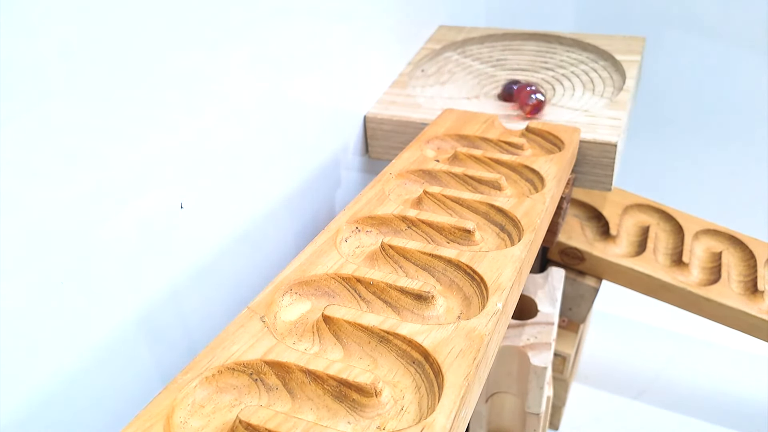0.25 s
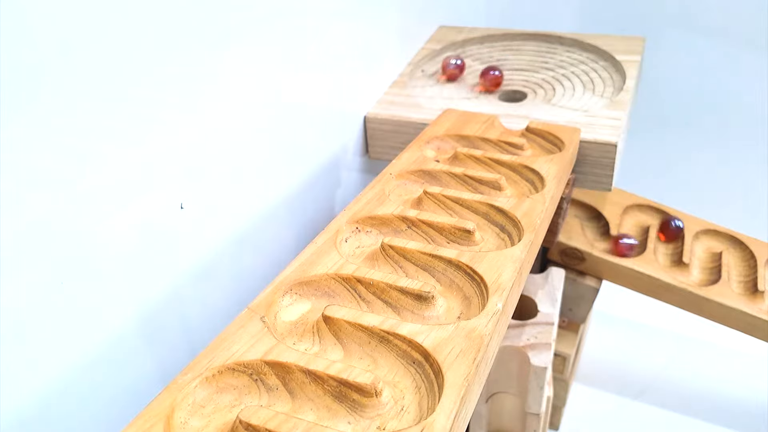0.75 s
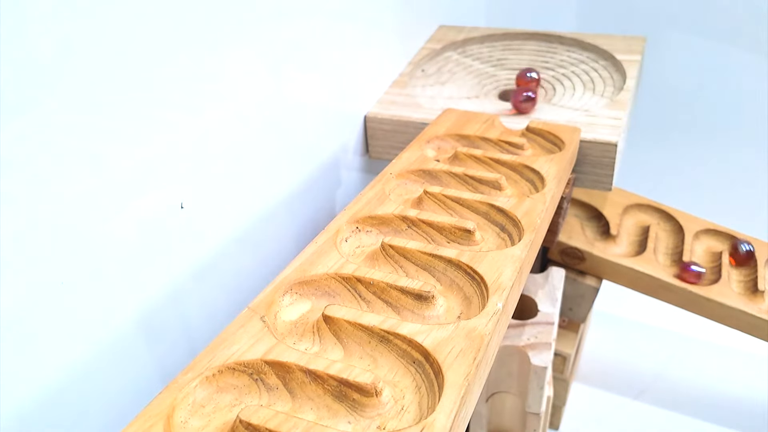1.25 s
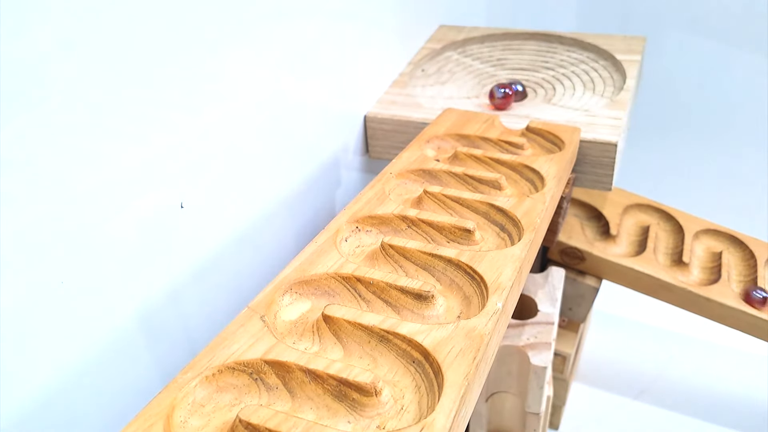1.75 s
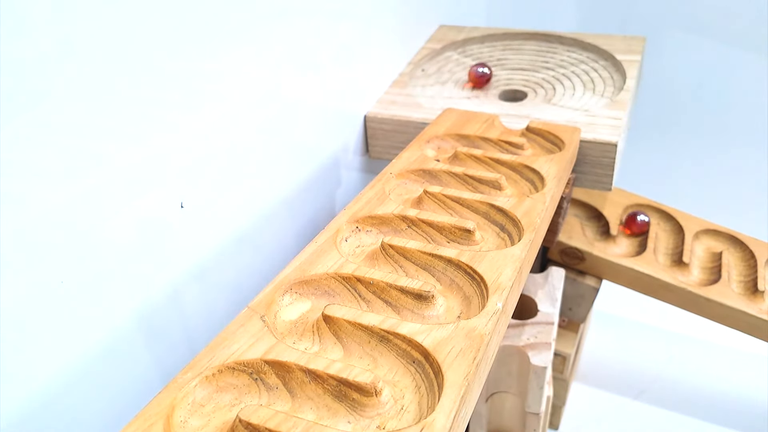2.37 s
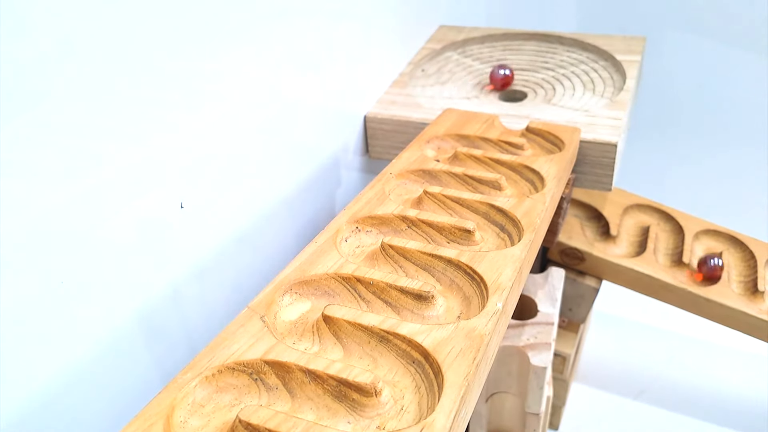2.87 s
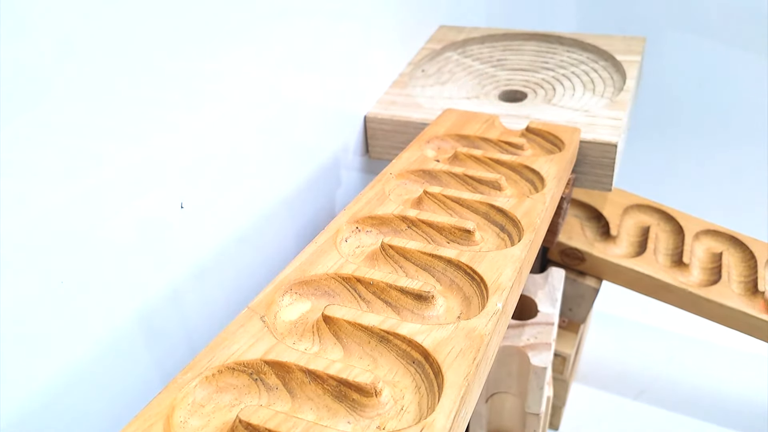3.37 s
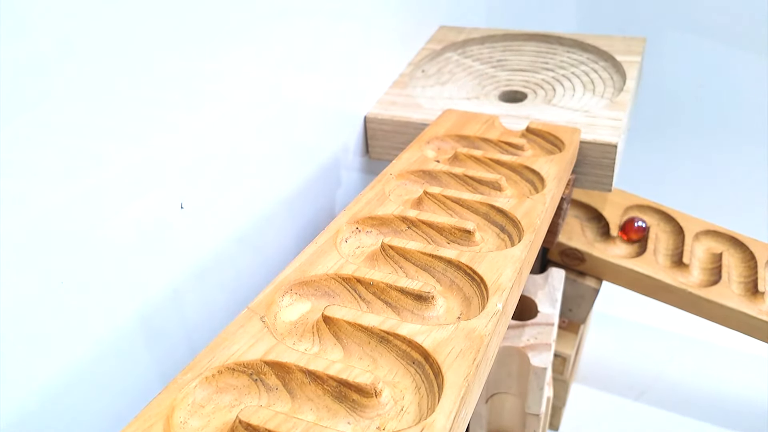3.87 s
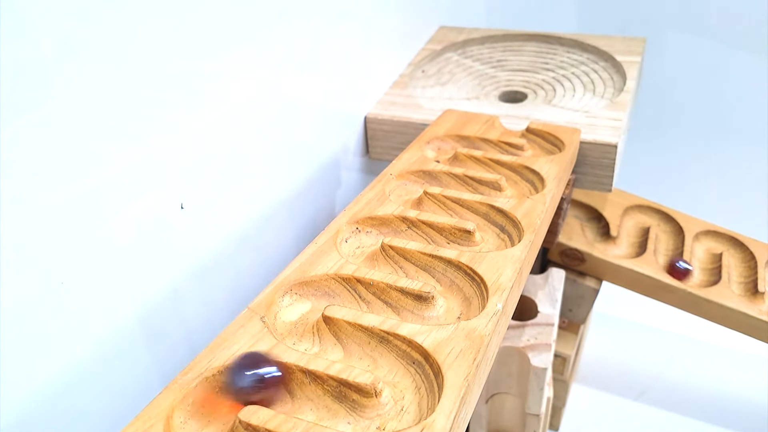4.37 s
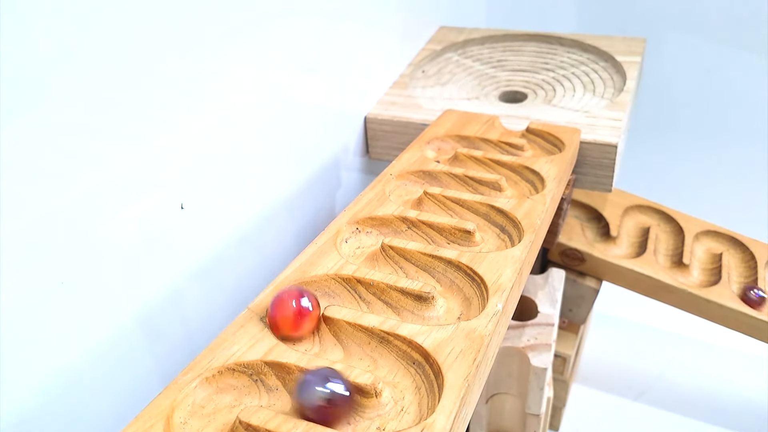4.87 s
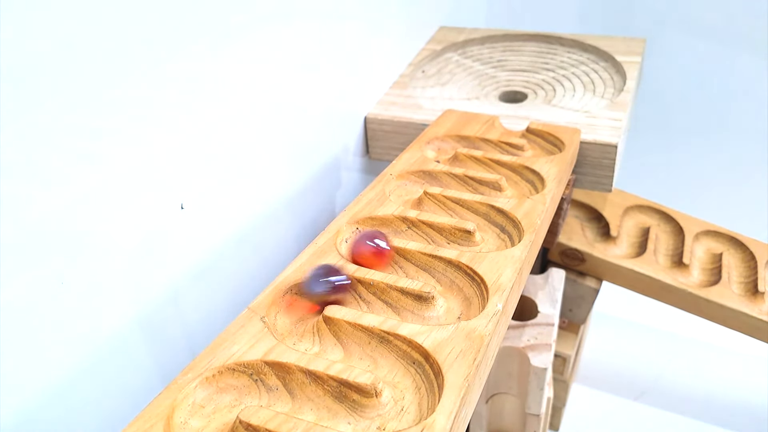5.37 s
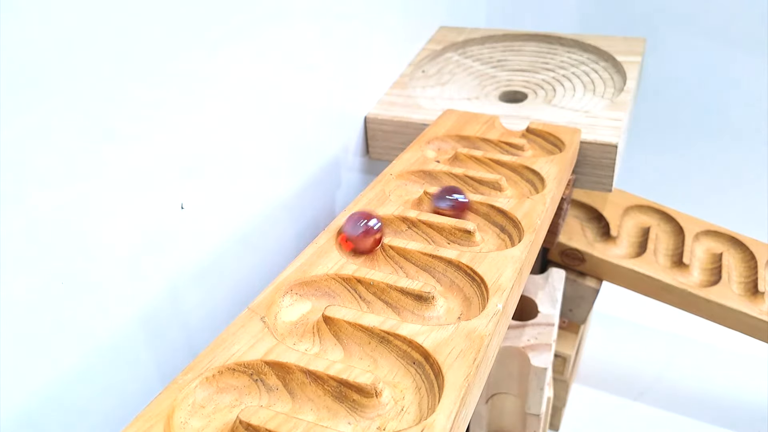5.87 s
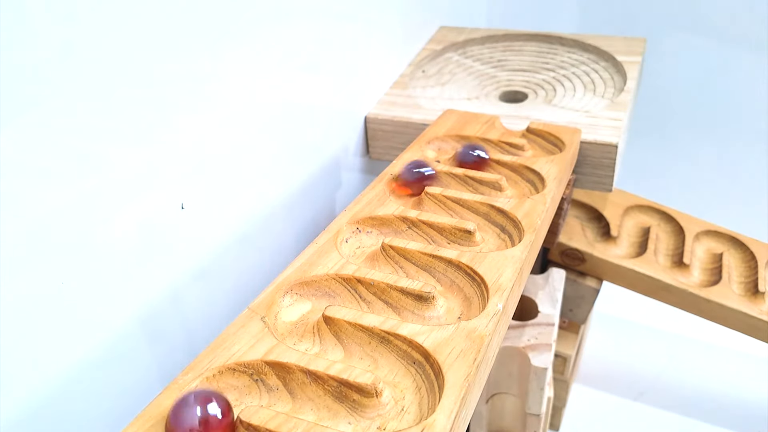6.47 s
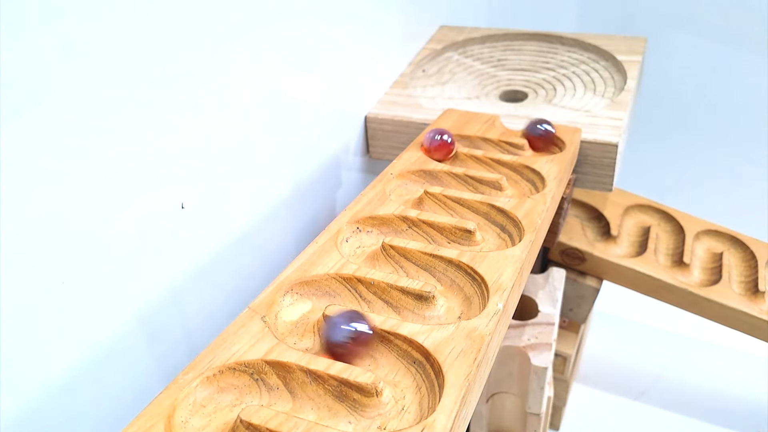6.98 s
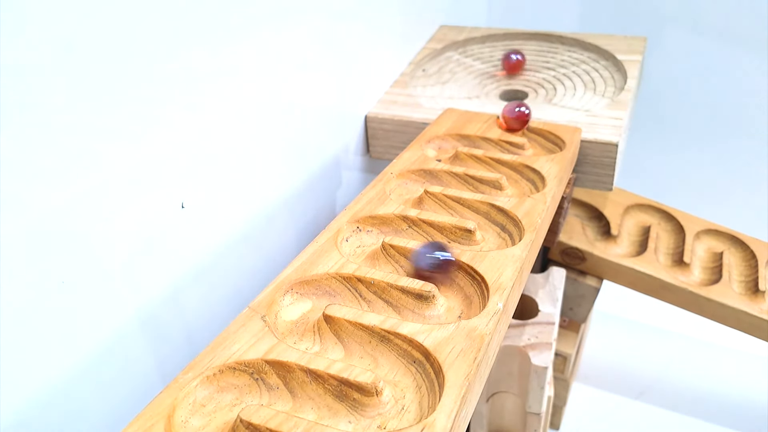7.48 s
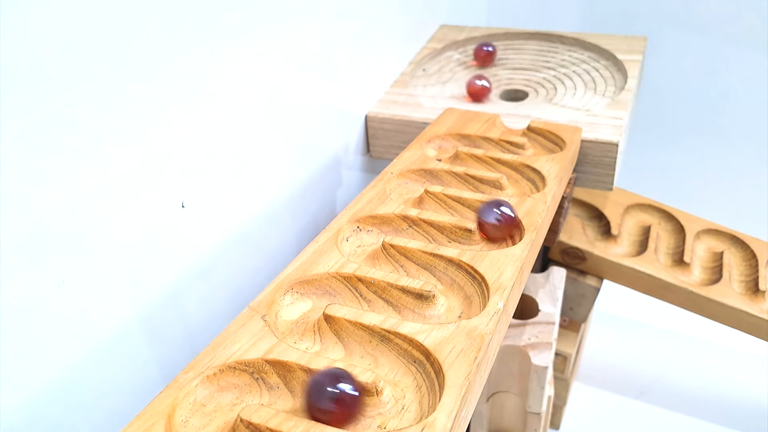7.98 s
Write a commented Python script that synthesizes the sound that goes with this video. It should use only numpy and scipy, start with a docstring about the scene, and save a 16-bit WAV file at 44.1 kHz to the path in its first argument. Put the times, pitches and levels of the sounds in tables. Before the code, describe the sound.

A close, dry-edged rattle of marbles on wood in a small lively room. Rolling is loudest in the first half, with short woody knocks and faint high glass ticks. Clusters of hard, bright tray bounces break in repeatedly, each fading fast. After the midpoint the rolling thins to lighter clicks, then a run of hollow wood clacks arrives near the end, finishing on quiet circling.

```python
"""Wooden marble run with catch tray

Glass marbles circle a wooden funnel and wind down grooved wooden tracks, close by in a small live room.
Rolling is a dense patter of contacts shaking funnel, tracks and stand; knocks are noisy cracks plus board rings.
Groove and tray hits add short swelling tones, glass ticks thin high clicks, soft bumps and a drop low booms.
Marbles leaving the run drop into a hard tray to the right: bounces ring its modes, a dense chatter fills in.
"""
import sys
import numpy as np
from scipy import signal
from scipy.fft import rfft, irfft
from scipy.io import wavfile
from scipy.ndimage import uniform_filter1d

SR = 44100
rng = np.random.default_rng(int(sys.argv[2]) if len(sys.argv) > 2 else 0)


def dump(signal):
    """Clip the signal to [-1, 1] and save it as 16-bit WAV at the path in sys.argv[1]."""
    limited = np.clip(np.atleast_2d(signal).T, -1, 1)
    pcm = np.round(limited * 32767).astype(np.int16)
    wavfile.write(sys.argv[1], SR, pcm)


N = 362929
SIZE = 4096  # samples in a response or strike
TIME = np.arange(N) / SR
FREQ = np.maximum(np.arange(SIZE // 2 + 1) * SR / SIZE, 1)

# All event levels are relative within their layer.
# Marble strikes a board: t/s, level/dB, lows/dB, upper mids/dB, treble/dB (nominal, re mids), left-right/dB
SIDE_KNOCKS = [(0.379, -24, 1, -13, -11, -4), (0.397, -22, 11, 3, -13, -1),
               (0.6294, -20.5, 6, -6, -51, -0.5), (0.7536, -22, 6, 6.5, -3, -2),
               (1.632, -20.5, -4.5, -12, -14, 1.5), (2.1362, -23.5, -5, 6, -3, -4),
               (2.2469, -16, -2.5, 2, -9, 2), (2.528, -28.5, -1, -1, -46, 6),
               (2.988, -12.5, -4.5, -3, -15.5, 1), (3.1635, -16, 0, -2.5, -15, -2),
               (3.7661, -14.5, -14, 8, -1, -8), (3.954, -22.5, -16, -9, -8, 2),
               (4.6303, -21.5, -1.5, 1, -27, 2.5), (2.1945, -23, -3, -1, -20, 3)]
FRONT_KNOCKS = [(4.347, -20.5, -11, -4.5, -29, 4), (4.844, -32, 7, 8, -8.5, -8),
                (5.057, -28, 9.5, -2, -19, -2), (5.7614, -28, 1, -2, -17, 4), (5.777, -35, 5, -7, -26, 6),
                (5.799, -36, -17, 0, -16, 3), (6.121, -17.5, -12, -11.5, -26, -1.5),
                (6.18, -34, -12, 12, -19, 3), (6.211, -30, -16, -25, -35, -3),
                (6.307, -33.5, -7, 0, -25, -4), (7.69, -31, 8, -2, -19, -4), (7.7296, -27, 8, 6.5, -25, -2),
                (7.923, -31, 2, -2, -41, -5), (8.004, -31, -3.5, -9, -30, 3)]
FUNNEL_KNOCKS = [(0.3231, -28, -1, -1, -48, 3), (0.4497, -23, 9.5, -9, -11.5, 2),
                 (6.615, -29, -2, 4, -20, 1), (6.6394, -11, -0.5, -6, -16, -1.5),
                 (6.9245, -15, 3.5, -2, -9, 1), (7.1085, -13, 3.5, -7.5, -19, 1.5),
                 (7.2455, -14.5, -2, -6.5, -18, 0), (7.3524, -15.5, 0, -2, -18, -1),
                 (7.4154, -21.5, -29, -7, -25, 1), (7.434, -20, 6, -2, -15, 0),
                 (7.492, -21.5, 3, -6, -20, 1), (7.5374, -21.5, 3, -3.5, -20, -0.5),
                 (7.5681, -25, -1, -16, -18, -6), (7.5936, -25.5, 5, 7, -24, 0),
                 (7.614, -28, 3, -7, -24, -1), (7.634, -30, 1, -3, -32, 2), (7.651, -28, 2, -4, -28, -3),
                 (7.7548, -22.5, 5, 2.5, -15, 0), (8.069, -26.5, 26, -26, -32, 4),
                 (8.094, -36, 32, -22, -27, 4)]
# Square hit on a groove wall: t/s, level/dB, board knock re clack/dB, knock treble/dB, left-right/dB
CLACKS = [(1.558, -19.5, 0, -21, 9), (2.1732, -21.5, -0.5, -18, 4), (3.2094, -20, -6.5, -16, 9),
          (3.279, -30.5, -18, -30, 8), (4.5591, -25, 3.5, -23.5, 5), (5.439, -23, -1, -7, 5.5),
          (5.497, -35, 7, -19, 5), (6.0345, -39, 0, -8, 4), (6.051, -36.5, 2, -16, 6)]
# Chatter in the tray, then in its corner: t/s, level/dB, hold/s, fade/(dB/s)
TRAY_SETTLE = [(1.07, -24, 0.0081, 157), (1.197, -19, 0.038, 194), (1.883, -21, 0.022, 75),
               (3.368, -18.5, 0.009, 129), (3.515, -24, 0.041, 172), (3.675, -20.5, 0.067, 96),
               (3.818, -26.5, 0.18, 200), (5.216, -19, 0.22, 197), (6.785, -22.5, 0.16, 145)]
CORNER_SETTLE = [(5.545, -32, 0.035, 100), (5.597, -30, 0.026, 320)]
# Board resonances, nominal: f/Hz, width/Hz, level over broad spectrum/dB
FUNNEL_MODES = [(352.6, 42.5, 13.9), (445, 63, 10.1), (569, 63, 11.2), (690, 210, 10.2), (957, 90, 12.3),
                (1186, 124, 11.1), (1522, 260, 12.9), (1880, 110, 6.5), (2690, 290, 9.3), (3370, 62, 3)]
SIDE_MODES = [(676, 45, 9.6), (1672, 45, 12), (2520, 120, 7.5), (2813, 260, 9.9), (3194, 85, 12.2),
              (3785, 160, 8.3), (4324, 220, 11), (4790, 130, 14.3), (5600, 48, 17)]
FRONT_MODES = [(1843, 146, 14.6), (2440, 180, 6), (2860, 86, 9), (3154, 110, 12.8), (3796, 78, 12.2),
               (4450, 89, 7.3)]


def undb(db):
    """Decibels to gain."""
    return 10 ** (np.asarray(db) / 20)


def level(x, db):
    """Scale to an rms level."""
    return x * undb(db) / np.sqrt(np.mean(x ** 2))


def sides(pan_db):
    """Left and right gains of equal total power; pan_db is left minus right."""
    return level(undb(np.array([[pan_db], [-pan_db]]) / 2), 0)


def together(*gains):
    """Unrelated shakes add in power."""
    return np.sqrt(sum(g ** 2 for g in gains))


def body(colour, modes=()):
    """Causal response of a body: a broad spectrum with steep resonances standing on it."""
    hz, db = np.transpose(colour)
    peaks = 1 + sum(undb(2 * d) / (1 + (2 * (FREQ - f) / w) ** 2) ** 2 for f, w, d in modes)
    broad = undb(np.interp(np.log(FREQ), np.log(hz), db))
    # folding the cepstrum makes the response minimum-phase
    cepstrum = irfft(np.log(broad * np.sqrt(peaks)))
    cepstrum[1:SIZE // 2] *= 2
    cepstrum[SIZE // 2 + 1:] = 0
    return irfft(np.exp(rfft(cepstrum)))


def spot(modes, vary_db, detune=0.0022):
    """Another contact place stirs the same resonances more or less strongly and loads them differently."""
    return [(f * (1 + detune * rng.standard_normal()), w, d + vary_db * rng.standard_normal())
            for f, w, d in modes]


def through(x, response):
    """Pass both channels through a response."""
    return signal.fftconvolve(x, np.atleast_2d(response), axes=1)[:, :x.shape[1]]


def room(x, wet_db):
    """Add the walls' diffuse tail, which builds up after a short gap."""
    # Room decay: f/Hz, t60/s
    decays = [(150, 0.29), (600, 0.43), (2000, 0.26), (5000, 0.27), (12000, 0.27)]
    hz, t60_s = np.transpose(decays)
    t = TIME[:SR // 2]
    noise = rfft(rng.standard_normal((2, len(t))))
    log_f = np.log(np.maximum(np.arange(noise.shape[1]) * SR / len(t), 1))
    tail = 0
    for band, decay_s in zip(np.eye(len(hz)), t60_s):
        band_noise = irfft(noise * np.interp(log_f, np.log(hz), band), len(t))
        tail = tail + band_noise * undb(-60 * t / decay_s)
    gap_s, build_s = 0.004, 0.0091
    tail = tail * np.clip((t - gap_s) / build_s, 0, 1)
    return x + through(x, level(tail, wet_db) / np.sqrt(len(t)))


def contact(t60_s, scatter_db, push_s=0.0099):
    """A brief push as the marble seats, plus reflections inside the object, different toward each side."""
    t = TIME[:SIZE]
    rise_s = 0.0008
    push = level(rng.standard_normal((2, SIZE)) * undb(-60 * t / push_s), 0)
    reflections = level(rng.standard_normal((2, SIZE)) * undb(-60 * t / t60_s), scatter_db)
    return (push + reflections) * np.clip(t / rise_s, 0, 1) / np.sqrt(SIZE)


def add(out, s, sound, db, pan_db):
    """Mix in one strike; its level is that of its first moments."""
    strike_s = 0.016
    first = np.sqrt(np.mean(sound[:, :int(strike_s * SR)] ** 2, axis=1, keepdims=True))
    i = max(int(s * SR), 0)
    out[:, i:i + SIZE] += (sound / first * undb(db) * sides(pan_db))[:, :N - i]


def burst(s, db, hold_s, fade_db_per_s):
    """Envelope of a chatter: quick attack, hold, steady fade."""
    attack_s = 0.0093
    t = TIME - s
    return np.clip(t / attack_s, 0, 1) * undb(db - abs(fade_db_per_s) * np.maximum(t - hold_s, 0))


def patter(rate_hz, spread_db, t60_s, shared):
    """Countless small contacts of uneven size, each a brief noisy shake; shared is the common power."""
    sizes = undb(spread_db * np.clip(rng.standard_normal(N), -2, 2))
    hits = (rng.random(N) < rate_hz / SR) * sizes
    # -120 in undb is 60 dB of power
    power = signal.lfilter([1], [1, -undb(-120 / (t60_s * SR))], hits ** 2)
    common = np.sqrt(shared) * rng.standard_normal(N)
    separate = np.sqrt(1 - shared) * rng.standard_normal((2, N))
    return np.sqrt(power) * (common + separate)


def travel(x, colour, modes, rate_hz, vary_db, detune, count=6):
    """A moving marble passes from one spot to the next, so the ring it stirs keeps shifting."""
    stay = int(SR / rate_hz)
    places = np.repeat(rng.integers(count, size=N // stay + 1), stay)[:N]
    out = 0
    for k in range(count):
        presence = uniform_filter1d(1. * (places == k), stay // 2)
        out = out + through(x * presence, body(colour, spot(modes, vary_db, detune)))
    return out


def booms():
    """Soft bumps and a marble's drop make short low booms: decaying sines."""
    # t/s, level/dB, f/Hz, t60/s
    low_booms = [(.856, -13, 93, 0.16), (0.86, -33, 273, 0.1), (0.863, -25, 59.6, 0.4),
                 (0.929, -25, 113, 0.33), (0.975, -20.5, 67.6, 0.17), (8.075, -40.5, 60.3, 0.38),
                 (8.07, -42, 119, 0.37)]
    rise_s = 0.0058
    out = np.zeros(N)
    for s, db, hz, t60_s in low_booms:
        t = np.maximum(TIME - s, 0)
        out += undb(db - 60 * t / t60_s) * (1 - np.exp(-t / rise_s)) * np.sin(2 * np.pi * hz * t)
    return out * undb(4.5)


def jolts(table, jolt_db):
    """Rough running after each knock, at a level relative to the knock."""
    return together(*(burst(s, db + jolt_db, hold_s=0.0097, fade_db_per_s=136) for s, db, *_ in table))


def shaking(share):
    """How hard stand, funnel and tracks shake: each from its own marbles and from its neighbours."""
    # Marbles winding down the tracks: t/s, level/dB
    track_roll = [(0, -31.5), (.55, -37), (.75, -31), (.95, -32.5), (1.45, -38), (1.75, -35), (2.2, -27),
                  (2.42, -64), (2.6, -35.5), (3.3, -27), (3.9, -29.5), (4.15, -35), (4.75, -38),
                  (5.1, -36.5), (5.7, -38), (6.25, -35.5), (6.55, -37), (7.87, -42)]
    # Marbles circling the funnel, one table per stay: t/s, level/dB
    funnel_stays = [
        [(0, -25.5), (.36, -29), (.56, -41), (.95, -51), (1.45, -46), (1.8, -53), (2.2, -33.5), (2.5, -31),
         (3.3, -51)],
        [(7.42, -68), (7.58, -36), (7.7, -42), (7.85, -44), (8.04, -41), (8.1, -33.5), (8.23, -33)],
    ]
    winding = undb(np.interp(TIME, *np.transpose(track_roll)))
    circling = together(*(undb(np.interp(TIME, *np.transpose(stay), left=-120, right=-120))
                          for stay in funnel_stays))
    track_jolts = jolts(SIDE_KNOCKS + FRONT_KNOCKS + CLACKS, jolt_db=-11)
    funnel_jolts = jolts(FUNNEL_KNOCKS, jolt_db=-12.5)
    chatter = together(*(burst(*row) for row in TRAY_SETTLE + CORNER_SETTLE))

    # undb factors below: coupling from the neighbours
    track = together(winding, track_jolts, chatter * undb(-30),
                     together(circling, funnel_jolts) * undb(-3))
    funnel = together(circling, funnel_jolts, winding * undb(-3.5), chatter * undb(-8.5))
    side_to_stand_db, front_to_stand_db = -10.5, -13.5  # the side track bears harder on the stand
    bearing_db = (1 - share) * side_to_stand_db + share * front_to_stand_db
    rumble_db = -43.5  # steady, under everything
    stand = together(undb(rumble_db), circling * undb(-10), winding * undb(bearing_db),
                     together(track_jolts, funnel_jolts) * undb(-7.5), chatter * undb(-15.5))
    return stand, funnel, track


def rolling():
    """Marbles ride over the wood grain and shake the funnel, the tracks and the stand beneath."""
    # Marbles leave the side track while new ones enter the front track: from/s, to/s
    handover_s = [3.85, 4.75]
    # Broad spectra: f/Hz, level/dB
    funnel_colour = [(120, -16.5), (280, 3.5), (600, -5.5), (1300, -8), (2200, -15), (3500, -47.5),
                     (5500, -36), (11500, -36), (15000, -68.5)]
    track_colour = [(400, -1.5), (1200, -2), (2000, 1), (3200, -8), (4500, -17), (6000, -25),
                    (11500, -37.5), (15000, -63.5)]
    stand_colour = [(20, -46.5), (50, -4), (90, 0.5), (130, 3.5), (160, -7.5), (220, -1), (320, -7),
                    (600, -19.5), (3000, -60.5), (15000, -74.5)]
    # f/Hz, width/Hz, level over broad spectrum/dB
    stand_modes = [(95, 8, 11.6), (128.7, 66, 6.1), (186.4, 32, 15.7), (240.6, 12, 12)]
    share = np.interp(TIME, handover_s, [0, 1])
    stand_gain, funnel_gain, track_gain = shaking(share)
    stand_patter = patter(rate_hz=260, spread_db=-2.5, t60_s=0.019, shared=0.93)
    stand = through(stand_patter, body(stand_colour, stand_modes))
    funnel_patter = patter(rate_hz=450, spread_db=3.0, t60_s=0.017, shared=0.22)
    funnel = through(funnel_patter, body(funnel_colour, FUNNEL_MODES))
    grain = patter(rate_hz=480, spread_db=8.5, t60_s=0.026, shared=0.05)
    side = travel(grain, track_colour, SIDE_MODES, rate_hz=14, vary_db=3.5, detune=0.02)
    front = travel(grain, track_colour, FRONT_MODES, rate_hz=22, vary_db=2.7, detune=0.023)
    track = (1 - share) * level(side, -12.5) + share * level(front, -4.0)
    boards = level(funnel, -6.0) * funnel_gain + track * track_gain
    return (room(boards, wet_db=-8.0) + level(stand, -1.77) * stand_gain) * sides(pan_db=-0.3)


def ticks():
    """Glass on glass is over in an instant: a thin, high click."""
    # t/s, level/dB
    glass_ticks = [(0.284, -39), (0.619, -44.5), (1.442, -37.5), (1.659, -39.5), (2.164, -32.5),
                   (2.2869, -29.5), (2.471, -39), (2.5941, -48), (3.123, -45), (4.282, -38), (4.341, -43.5),
                   (4.415, -46.5), (4.681, -50), (4.8014, -50), (5.815, -43.5), (7.18, -40.5),
                   (7.7548, -40.5)]
    # f/Hz, level/dB
    tick_colour = [(1000, -16.5), (3500, -1), (5500, 3.5), (8000, -0.5), (11000, 3), (13000, -13),
                   (16000, -27)]
    out = np.zeros((2, N))
    glass = body(tick_colour)
    for s, db in glass_ticks:
        click = contact(t60_s=0.07, scatter_db=-7.5, push_s=0.0048)
        add(out, s, through(click, glass), db, pan_db=-9)
    return room(out, wet_db=-5.5)


def knocks(table, modes, smear_s, scatter_db, ring_db, **push):
    """Each board has its own short ring; harder contacts reach higher."""
    out = np.zeros((2, N))
    for s, db, body_db, edge_db, snap_db, pan_db in table:
        colour = [(70, body_db - 15.0), (250, body_db - 6.0), (800, body_db), (1800, 0.0028),
                  (3600, edge_db), (7000, snap_db - 6.0), (15000, snap_db - 19)]
        wood = body(colour)
        crack = through(contact(smear_s, scatter_db, **push), wood)
        # the blow itself starts the resonances, so they ring out cleanly under the crack
        ring = np.array([body(colour, spot(modes, vary_db=4.0)) - wood for _ in range(2)])
        # the board radiates unevenly; its ring reaches the right microphone later
        ring[1] = np.roll(ring[1], rng.integers(4, 24))
        add(out, s, crack + undb(ring_db) * ring, db, pan_db)
    return out


def ping(hz, rise_s):
    """One resonance that swells and is gone in milliseconds, a little later at the right microphone."""
    max_lag_s = 0.0001
    t = np.maximum(TIME[:SIZE] - np.array([[0], [rng.uniform(0, max_lag_s)]]), 0)
    varied_hz = hz * (1 + 0.0073 * rng.standard_normal())
    return t / rise_s * np.exp(-t / rise_s) * np.sin(2 * np.pi * varied_hz * t)


def clacks():
    """Square hits on a groove wall: one high resonance over a knock of the board."""
    out = np.zeros((2, N))
    board = []
    for s, db, wood_db, snap_db, pan_db in CLACKS:
        add(out, s, ping(hz=3122, rise_s=0.0015), db, pan_db)
        board.append((s, db + wood_db, -1.5, -1.5, snap_db, pan_db / 2))
    wood = knocks(board, SIDE_MODES, smear_s=0.08, scatter_db=13.5, ring_db=8.0)
    return room(out, wet_db=-13.5) + room(wood, wet_db=-11)


def woodwork():
    """Thin tracks click; the thick funnel block gives a fuller clack; landings thud."""
    # Marble lands in the tray: columns as SIDE_KNOCKS
    landings = [(1.0446, -20, 3, -7, -26, -1), (1.859, -32, 20, 5, -13.5, -24), (1.875, -15, 8.5, -6, 0, 1),
                (1.9702, -16.5, 2, -29, 6, -3.5), (3.3456, -18.5, 3.5, -23, -1.5, 0),
                (3.6579, -20.5, 5, 2, -28.5, -2.5), (5.2156, -20.5, 1, -3, 1, -2),
                (6.7746, -21, 6, -18, 3, -6)]
    # f/Hz, width/Hz, level over broad spectrum/dB
    landing_modes = [(1450, 640, 21)]
    side = knocks(SIDE_KNOCKS, SIDE_MODES, smear_s=0.059, scatter_db=13.0, ring_db=14.5)
    front = knocks(FRONT_KNOCKS, FRONT_MODES, smear_s=0.1, scatter_db=13.5, ring_db=12.5)
    block = knocks(FUNNEL_KNOCKS, FUNNEL_MODES, smear_s=0.11, scatter_db=3.0, ring_db=-1.5, push_s=0.028)
    thuds = knocks(landings, landing_modes, smear_s=0.13, scatter_db=14.0, ring_db=2.5)
    tracks = room((side + front) * undb(-2.73), wet_db=-8.5)
    return tracks + room(block * undb(-1.5) + thuds * undb(-0.5), wet_db=-7.0)


def pings():
    """Tray hits sound its main resonance as a short swelling tone, often over a bounce."""
    # t/s, level/dB
    tray_pings = [(1.0446, -19), (1.2179, -28), (1.2462, -32), (1.9789, -30), (3.3455, -22), (3.373, -25),
                  (3.534, -28), (3.6562, -19.5), (3.6663, -19.5), (3.7235, -26), (3.7473, -25),
                  (5.3337, -16), (5.36, -19), (5.395, -17), (5.4265, -19), (6.7732, -21.5), (6.8037, -27.5),
                  (6.8874, -31)]
    out = np.zeros((2, N))
    for s, db in tray_pings:
        add(out, s, ping(hz=4628, rise_s=0.0018), db, pan_db=-7.5)
    return room(out, wet_db=-9.0)


def rattle(bounces, settles, colour, modes):
    """Hard bounces ring the part they strike; quick small ones fill in as the marble settles."""
    out = np.zeros((2, N))
    for s, db, bright_db in bounces:
        hardness = body([(4800, 0), (7000, bright_db / 2), (9000, bright_db + 6.5)])
        push = through(contact(t60_s=0.064, scatter_db=3.5, push_s=0.015), hardness)
        add(out, s, through(push, body(colour, spot(modes, vary_db=2.0))), db, pan_db=-2.0)
    settling = together(*(burst(*row) for row in settles))
    contacts = patter(rate_hz=130, spread_db=4.0, t60_s=0.016, shared=0.047)
    small = travel(contacts, colour, modes, rate_hz=42, vary_db=2.5, detune=0.014)
    return out + settling * level(small, -0.43)


def tray():
    """The tray's floor, rim and corner ring at different pitches; the run shades their treble to the left."""
    # Bounces: t/s, level/dB, brightness/dB
    floor_bounces = [(1.0446, -13, -7.5), (1.1725, -20, 6), (1.2167, -19.5, -4), (1.238, -22.5, -17),
                     (1.2631, -27, -1), (1.8759, -17.5, 2.5), (1.9574, -23.5, 2), (1.9694, -22.5, -6),
                     (2.0244, -20, -4), (2.0628, -17, -6.5), (3.3449, -13.5, -2), (3.471, -19.5, 6),
                     (3.5094, -14, -5), (3.6577, -14.5, -5.5), (3.8068, -13.5, -8), (3.8402, -17, -7),
                     (3.9039, -15, -4.5), (5.2156, -16.5, -2), (5.227, -18, -6.5), (5.2526, -17, -7),
                     (5.2923, -18, 0), (5.3252, -17, -4.5), (5.3858, -20, 3.5), (6.7745, -13, -6),
                     (6.837, -20, 3), (6.8522, -14, -2.5)]
    rim_bounces = [(.079, -28, -20), (.1165, -12, -4), (.153, -17.5, -9), (.175, -19, -9),
                   (.231, -17.5, -8)]
    corner_bounces = [(5.597, -24.5, -12)]
    # Chatter on the rim: t/s, level/dB, hold/s, fade/(dB/s)
    rim_settle = [(-.01, -21.5, 0.012, 173), (0.116, -34, 0.085, 107)]
    # Broad spectra: f/Hz, level/dB
    tray_colour = [(50, -18), (100, -10.5), (400, -1.5), (1200, -6), (2200, -11.5), (3000, -10.5),
                   (3550, -10), (4200, -6), (5000, -4.5), (7500, -12.5), (11000, -10), (14500, -17),
                   (16000, -26.5)]
    rim_colour = [(80, -49), (400, -5), (1000, 8), (2500, -10), (5000, -3.5), (9000, -15.5), (12500, -16.5),
                  (15000, -34)]
    # Resonances, nominal: f/Hz, width/Hz, level over broad spectrum/dB
    floor_modes = [(217, 60, 12.5), (443, 53, 11), (1400, 320, 13.5), (2890, 150, 5), (4330, 380, 6),
                   (4639, 96, 24), (4824, 97, 13), (5110, 340, 9), (6780, 320, 13.5), (8210, 170, 10.5),
                   (9740, 310, 9.5), (10500, 140, 9), (11310, 250, 9.5)]
    rim_modes = [(3450, 420, 9.5), (4580, 160, 11), (5650, 280, 13.5), (7050, 900, 6), (9700, 450, 4),
                 (10600, 250, 8), (11500, 250, 7), (12300, 500, 4)]
    corner_modes = [(217, 84, 11), (443, 72, 11.3), (1380, 460, 17), (1870, 200, 8.8), (4950, 200, 1),
                    (5130, 150, 8.1), (9700, 300, 10)]
    out = rattle(floor_bounces, TRAY_SETTLE, tray_colour, floor_modes)
    out += rattle(rim_bounces, rim_settle, rim_colour, rim_modes)
    out += rattle(corner_bounces, CORNER_SETTLE, tray_colour, corner_modes)
    left = body([(400, 2.0), (1300, -8.0), (2400, 5.5), (4600, -4.5), (8000, -3.5), (10500, -11.5),
                 (13500, -0.5)])
    right = body([(400, -6.0), (1300, -6.0), (2400, 0.5), (4600, -1.5), (8000, 2.5), (10500, 3.0),
                  (13500, 2.0)])
    return room(through(out, [left, right]) * undb(-1.5), wet_db=-1.0)


def scene():
    """The whole run at once; long waves reach both microphones nearly alike, a little stronger on the left."""
    sound = booms() + rolling() + ticks() + clacks() + woodwork() + pings() + tray()
    bass = signal.sosfiltfilt(signal.butter(1, 498, "low", fs=SR, output="sos"), sound)
    shared = bass.mean(axis=0) * sides(pan_db=2.5)
    return sound + 0.74 * (shared - bass)


def record(dry):
    """The recorder clips at full scale and cuts the top."""
    top_hz = 15600
    return signal.sosfilt(signal.ellip(8, .2, 70, top_hz, fs=SR, output="sos"), np.clip(dry, -1, 1))


dry = scene()
out = record(dry)
dump(out)
```